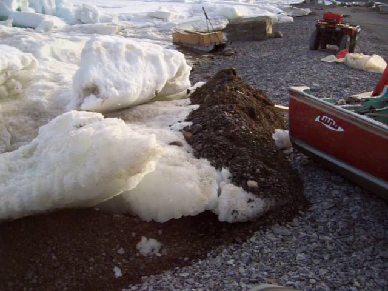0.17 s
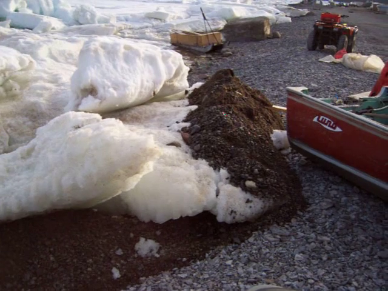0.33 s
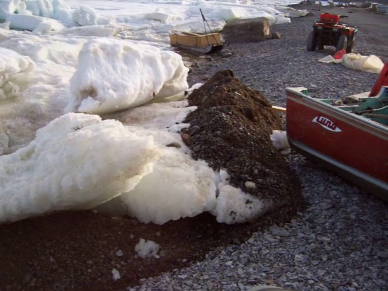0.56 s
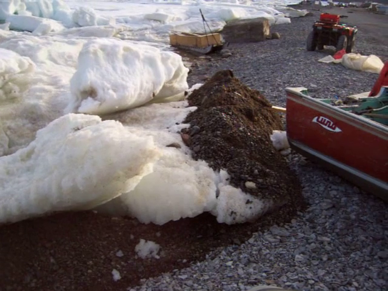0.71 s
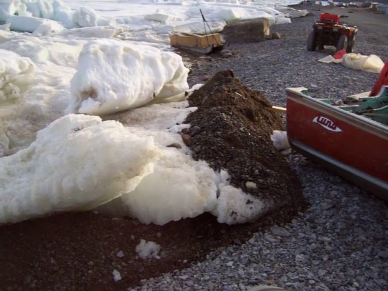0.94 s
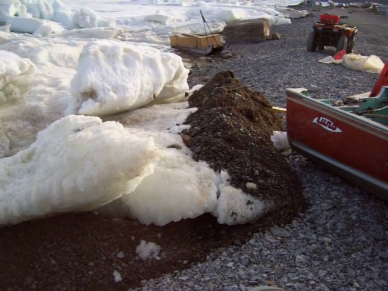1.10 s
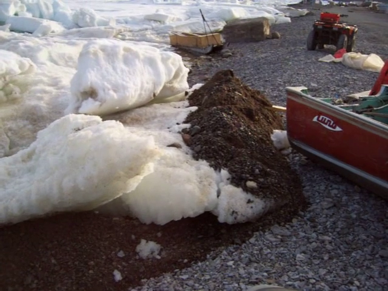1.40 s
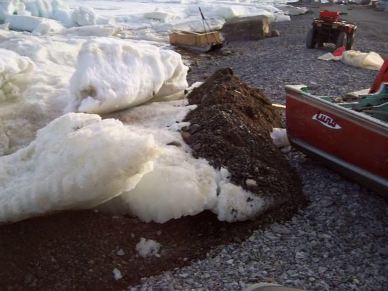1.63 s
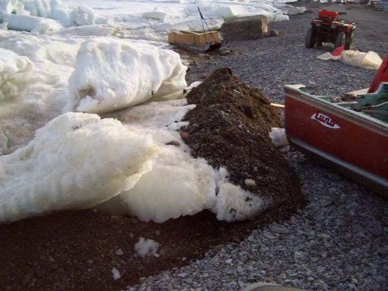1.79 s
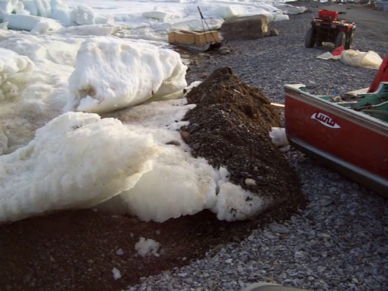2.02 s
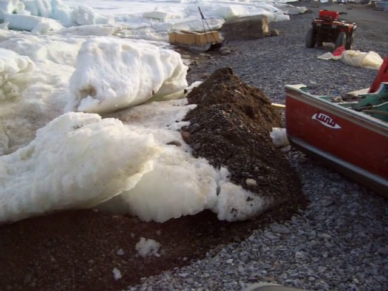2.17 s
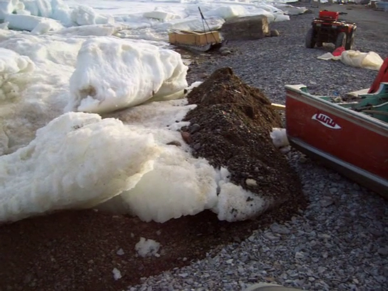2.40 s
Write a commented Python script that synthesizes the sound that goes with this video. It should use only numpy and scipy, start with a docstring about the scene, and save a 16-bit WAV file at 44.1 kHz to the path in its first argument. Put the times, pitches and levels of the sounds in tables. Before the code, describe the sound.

Steady rain hisses and patters on a stony, icy shore, with sharp ticks and one hollow knock.

```python
"""A stony, icy shore in the rain. Far drops merge into a hiss of filtered noise, nearer ones patter on stones and
drum on cloth by the microphone, and wind rumbles below. The largest drops are heard singly: ticks on stone are
damped sines with a little spray, splashes are bursts of banded noise, soft thuds on cloth are low damped sines
with an overtone, and one drop knocks on a hollow shell and rings its modes."""
import sys
import numpy as np
from scipy import signal
from scipy.fft import rfft, irfft, next_fast_len
from scipy.io import wavfile
from scipy.ndimage import uniform_filter1d, map_coordinates

SR = 44100
rng = np.random.default_rng(int(sys.argv[2]) if len(sys.argv) > 2 else 0)


def gain_from_db(level_db):
    """Convert decibel levels to linear amplitude factors (20 dB per decade)."""
    decades = np.asarray(level_db, float) / 20
    return 10 ** decades


def wav_out(sig):
    """Save sig, one row per channel (or a flat mono array), as 16-bit PCM at SR to the path in sys.argv[1]."""
    wavfile.write(sys.argv[1], SR, np.round(np.clip(np.atleast_2d(sig).T, -1, 1) * 32767).astype(np.int16))


N = 112454  # length in samples
SPRAY_WIDTH = 0.5  # of the noise band, in natural log of frequency


def unit(x):
    """Scale to rms 1."""
    return x / np.sqrt(np.mean(x ** 2) + 1e-20)


def wobble(rate):
    """A smooth random curve through rate knots a second."""
    knots = rng.standard_normal(int(N * rate / SR) + 4)
    return map_coordinates(knots, [np.arange(N) * rate / SR])


def filtered(x, response):
    """Multiply the spectrum of x by a response of frequency in Hz."""
    size = next_fast_len(x.shape[-1] + 8192)
    spectrum = rfft(x, size) * response(np.fft.rfftfreq(size, 1 / SR))
    return irfft(spectrum, size)[..., :x.shape[-1]]


def coloured(x, spectrum):
    """Filter x through (Hz, dB) points joined on a log frequency axis, then scale to rms 1."""
    points_hz, db = np.transpose(spectrum)

    def response(hz):
        return gain_from_db(np.interp(np.log(hz + 1), np.log(points_hz + 1), db))

    return unit(filtered(x, response))


def patchy(patchy_db, bands, frames):
    """White noise whose gain varies at random in patches of time and frequency, by patchy_db rms."""
    noise = signal.stft(rng.standard_normal(N), nperseg=256)[2]
    field = uniform_filter1d(rng.standard_normal(noise.shape), bands, 0)
    field = uniform_filter1d(field, frames, 1)
    return signal.istft(noise * gain_from_db(patchy_db * unit(field)), nperseg=256)[1][:N]


def placed(start_s, rows):
    """Sum each row of samples into the scene at its start."""
    at = np.round(start_s * SR).astype(int)[:, None] + np.arange(rows.shape[1])
    return np.bincount(at.ravel(), rows.ravel(), N + SR)[:N]


def struck(t60, rise_s, size):
    """Times and envelopes of peak 1: a soft rise, then a decay of 60 dB in t60 seconds."""
    t = np.arange(size) / SR
    envelope = (1 - np.exp(-t / rise_s)) ** 2 * gain_from_db(-60 * t / t60[:, None])
    return t, envelope / envelope.max(1, keepdims=True)


def rings(start_s, db, hz, t60, rise_s, size):
    """One damped sine a row, size samples long."""
    t, envelope = struck(t60, rise_s, size)
    sines = np.sin(2 * np.pi * hz[:, None] * t)
    return placed(start_s, gain_from_db(db)[:, None] * envelope * sines)


def sprays(start_s, db, hz, t60, rise_s):
    """One decaying burst of noise a row, in a band round its centre, cut off after 68 ms."""
    size = 3000
    envelope = struck(np.clip(t60, 0.003, 0.3), rise_s, size)[1]
    # distance from the band centre in natural log of frequency
    log_offset = np.log((np.fft.rfftfreq(size, 1 / SR) + 1) / hz[:, None])
    band = np.exp(-(log_offset / SPRAY_WIDTH) ** 2)
    noise = irfft(rfft(rng.standard_normal(envelope.shape)) * band, size)
    noise = noise / noise.std(1, keepdims=True) / 2
    return placed(start_s, gain_from_db(db)[:, None] * envelope * noise)


def scattered(count, hz, spread, cycles, db, tail_db, size):
    """Drops at random times and log-normal pitches; a few stray louder (tail_db > 0) or softer (< 0)."""
    draws = rng.random((count, 2))
    pitch = np.clip(hz * np.exp(spread * rng.standard_normal(count)), 120, 9000)
    drop_db = np.minimum(-tail_db * np.log(1 - draws[:, 1]), 9)  # the loudest is held to 9 dB
    start_s = draws[:, 0] * N / SR
    drops = rings(start_s, drop_db, pitch, cycles / pitch, 0.3 / pitch[:, None], size)
    return gain_from_db(db) * unit(drops)


# Sharp drops on stone. Each row: start in seconds, level in dB, pitch in Hz, cycles to fall by 60 dB.
STONE_TICKS = [(0.185, -24, 6200, 8), (0.5864, -24.5, 6260, 9), (0.8698, -17, 6300, 6.7),
               (0.909, -20, 6460, 8), (0.941, -15.5, 6500, 12), (0.9656, -22.5, 2880, 5.7),
               (1.1954, -18.5, 6200, 4.4), (1.2446, -17, 5630, 6), (1.3362, -14, 5600, 27),
               (1.398, -15, 5320, 6), (1.4295, -4.5, 5490, 8.5), (1.478, -15, 6560, 11),
               (1.6986, -28.5, 2600, 13), (1.7159, -6.5, 5680, 8.5), (1.775, -22, 5210, 5.8),
               (1.81, -14.5, 6420, 11), (1.924, -19, 5970, 12), (2.0138, -25, 6170, 11),
               (2.049, -20, 6130, 11), (2.168, -15, 5760, 4.2)]
# Modes of a struck pebble. Each row: pitch in Hz, level in dB, time to fall by 60 dB in seconds.
PEBBLE_MODES = [(1690, -25, 0.013), (2120, -22, .008), (2880, -15.5, 0.0076)]


def ticks():
    """Hard stone gives a short ring and a little broad spray; one drop makes a pebble ping."""
    rise_s = 0.0001
    start_s, db, hz, cycles = np.transpose(STONE_TICKS)
    ring = rings(start_s, db, hz, cycles / hz, rise_s, size=1500)
    spray = sprays(start_s, db - 10.5, hz, np.full(len(hz), 0.013), rise_s)
    mode_hz, mode_db, mode_t60 = np.transpose(PEBBLE_MODES)
    ping_s = np.full(len(mode_hz), 1.336)
    ping = rings(ping_s, mode_db, mode_hz, mode_t60, rise_s=0.00068, size=1500)
    return ring + spray + ping


# Drops that burst into spray. Each row: start in seconds, level in dB, centre in Hz,
# time to fall by 60 dB in seconds.
SPRAY_DROPS = [(0.0184, -26, 7060, 0.029), (0.0843, -27.5, 5100, 0.03), (0.185, -30.5, 5640, 0.12),
               (0.3148, -29.5, 6850, 0.051), (0.4624, -18.5, 5630, 0.013), (0.5863, -24, 5400, 0.032),
               (0.671, -24, 5200, 0.027), (0.737, -23.5, 6340, 0.016), (0.904, -27, 6040, 0.2),
               (0.933, -18.5, 5800, 0.015), (0.972, -24, 5170, 0.015), (1.0351, -26, 6070, 0.018),
               (1.108, -30.5, 6320, 0.12), (1.2463, -26, 5530, 0.029), (1.265, -28, 5930, 0.13),
               (1.302, -23, 6500, 0.04), (1.3138, -16.5, 6800, 0.014), (1.3728, -28.5, 6090, 0.03),
               (1.417, -30, 5900, 0.014), (1.5, -31, 5340, 0.04), (1.571, -25.5, 6660, 0.077),
               (1.826, -31, 5200, 0.034), (1.9621, -29.5, 5470, 0.062), (1.9907, -28.5, 5600, 0.03),
               (2.0772, -23, 6570, 0.044), (2.1672, -32, 6100, 0.048), (2.241, -28, 5730, 0.025),
               (2.2756, -22, 5470, 0.028), (2.4023, -35, 5330, 0.037), (2.4318, -31.5, 4170, 0.034)]


def splashes():
    """Each bursting drop is a quick rise and decay of noise round its centre frequency."""
    return sprays(*np.transpose(SPRAY_DROPS), rise_s=0.00038)


# Heavy drops on the cloth by the microphone. Each row: start in seconds, level in dB, pitch in Hz.
CLOTH_THUDS = [(.32, -26.5, 365), (.621, -18.5, 232), (.911, -22, 159), (.981, -21, 400), (1.571, -21, 635),
               (1.599, -22.5, 254), (1.657, -25, 310), (1.757, -23, 297), (1.9744, -22, 410),
               (2.294, -17, 326), (2.398, -29, 324)]


def thuds():
    """Soft cloth gives a low push of a cycle or two, with a brief, sharper overtone."""
    rise_s = 0.00045
    start_s, db, hz = np.transpose(CLOTH_THUDS)
    push = rings(start_s, db, hz, 3.1 / hz, rise_s, size=4000)
    over_hz = 2.5 * hz
    overtone = rings(start_s, db - 5.5, over_hz, 3.3 / over_hz, rise_s, size=4000)
    return push - overtone


# Modes of the hollow shell. Each row: pitch in Hz, relative level in dB, time to fall by 60 dB in seconds.
SHELL_MODES = [(181, 6, 0.024), (311, -5.5, 0.057), (736, -6.5, 0.029), (1014, -10, 0.025),
               (1246, -10, 0.017), (2000, -20.5, 0.016), (2300, -17, 0.017), (2800, -22, 0.022),
               (5450, -21, 0.018), (6400, -19, 0.016)]
# The drop bursting on the shell. Each row: start in seconds, level in dB, centre in Hz,
# time to fall by 60 dB in seconds.
SHELL_SPRAY = [(1.6423, -22, 3900, 0.016)]


def knock():
    """One large drop rings the shell's modes together and bursts into spray."""
    rise_s, knock_db = 0.0025, -9.5
    hz, db, t60 = np.transpose(SHELL_MODES)
    modes = rings(np.full(len(hz), 1.641), db + knock_db, hz, t60, rise_s, size=6000)
    return sprays(*np.transpose(SHELL_SPRAY), rise_s) - modes


# Colour of the drumming on cloth. Each row: frequency in Hz, relative level in dB per Hz.
DRUM_COLOUR = [(65, -30), (110, 3), (361, 4), (494, -1.5), (1170, -6.5), (1880, -15), (2500, -27.5),
               (3250, -18), (5500, -120)]


def drumming():
    """Drops on cloth: a low, patchy noise bed and scattered dull taps, at rms 1."""
    bed = coloured(patchy(0.65, bands=3, frames=7), DRUM_COLOUR)
    # db is the level of all the taps against the bed, cycles the time to fall by 60 dB
    taps = scattered(count=300, hz=325, spread=0.58, cycles=2.1, db=-6, tail_db=-1.5, size=2500)
    return unit(bed + taps)


# Colour of the far rain. Each row: frequency in Hz, relative level in dB per Hz.
HISS_COLOUR = [(710, -13.5), (1200, -1.5), (1890, -1), (2350, 7.5), (3290, 3), (4560, 6.5), (6380, 6.5),
               (7420, 3), (8490, 0.5), (8930, -10.5), (11600, -59), (19600, -120)]


def hiss():
    """Far drops merge into patchy noise, with nearer drops pattering on stones, at rms 1."""
    bed = coloured(patchy(1.43, bands=12, frames=5), HISS_COLOUR)
    patter = scattered(count=700, hz=6000, spread=0.2, cycles=6, db=-6, tail_db=3, size=300)
    return unit(bed + patter)


# Colour of the wind rumble. Each row: frequency in Hz, relative level in dB per Hz.
RUMBLE_COLOUR = [(12, -33.5), (20, -8.5), (54, -6), (130, -15.5), (170, -29.5), (290, -120)]


def wind_rumble():
    """Wind as deep filtered noise, at rms 1."""
    return coloured(rng.standard_normal(N), RUMBLE_COLOUR)


# Course of the steady sound. Each row: time in seconds, level of the hiss in dB,
# level of the drumming in dB, level of the wind rumble in dB.
RAIN_COURSE = [(0.0, -40, -37, -43), (0.17, -41, -35, -44), (0.45, -40, -35, -42),
               (1.01, -39.5, -34.5, -36.5), (1.17, -38.5, -34.5, -39.5), (1.35, -38, -36, -36.5),
               (1.5, -38.5, -36.5, -39), (1.67, -42, -34, -35), (1.83, -42, -36, -44.5),
               (2.1, -39.5, -36, -44.5), (2.26, -42, -35.5, -43), (2.55, -41.5, -36, -39)]


def steady_rain():
    """Drumming and hiss over wind rumble; each level flutters, partly in common."""
    time_s, *levels = np.transpose(RAIN_COURSE)
    hiss_db, drum_db, rumble_db = [np.interp(np.arange(N) / SR, time_s, level) for level in levels]
    shared = wobble(25.1)
    drum_db = drum_db + 1.4 * shared + 0.27 * wobble(39.34)
    hiss_db = hiss_db + 0.65 * shared + 1.05 * wobble(70)
    rumble_db = rumble_db + 0.35 * shared
    return gain_from_db(drum_db) * drumming() + gain_from_db(hiss_db) * hiss() + gain_from_db(rumble_db) * wind_rumble()


def scene():
    """All the rain and the wind, in one channel."""
    return (ticks() + splashes() + thuds() + knock() + steady_rain())[None]


def roll_off(x):
    """The treble ends steeply here."""
    return signal.sosfilt(signal.butter(12, 9080, fs=SR, output="sos"), x)


def record(dry):
    """The microphone loses deep bass and high treble, and its band ends abruptly."""
    def microphone(hz):
        bass_cut = (1j * hz / (70.2 + 1j * hz)) ** 2
        treble_cut = 1 / (1 + (hz / 7810) ** 20.6)
        return bass_cut * treble_cut * (hz < 9200)

    mix = filtered(dry, microphone)
    return roll_off(mix)


dry = scene()
out = record(dry)
wav_out(out)
```